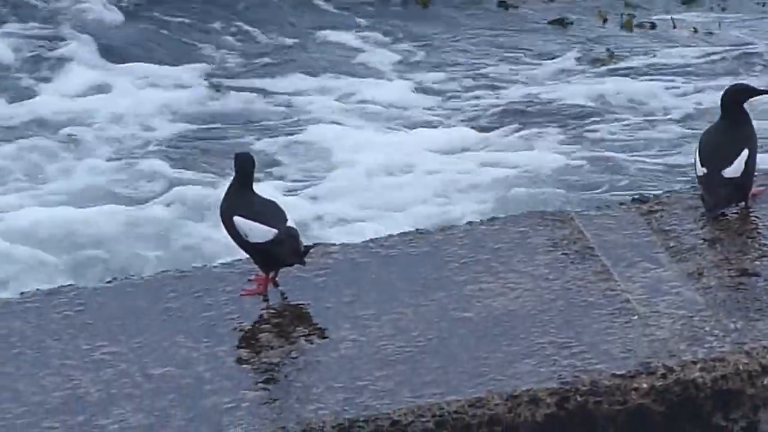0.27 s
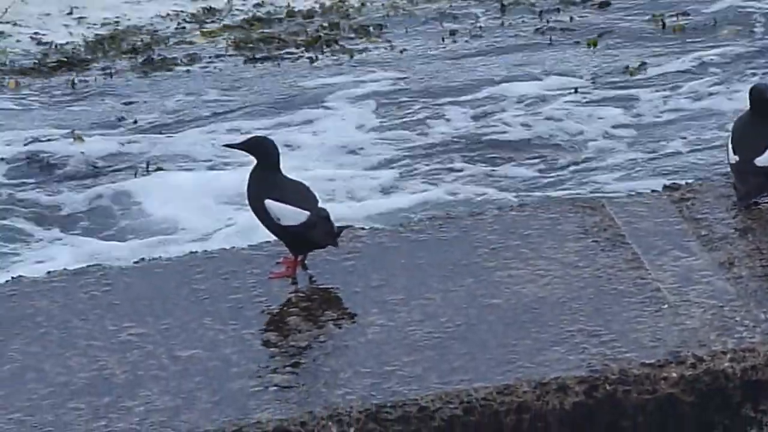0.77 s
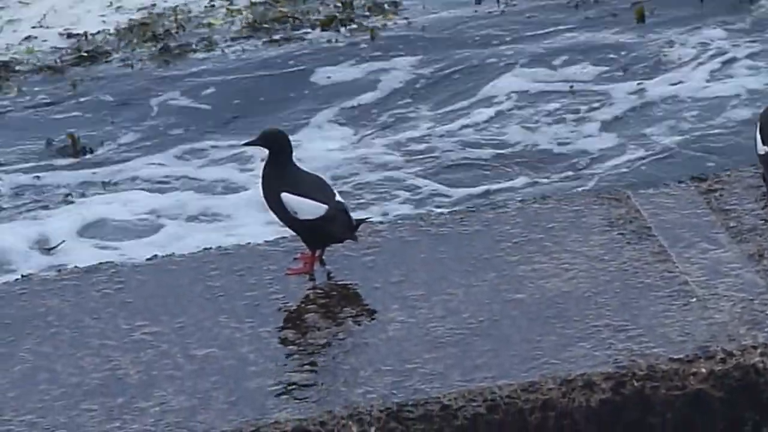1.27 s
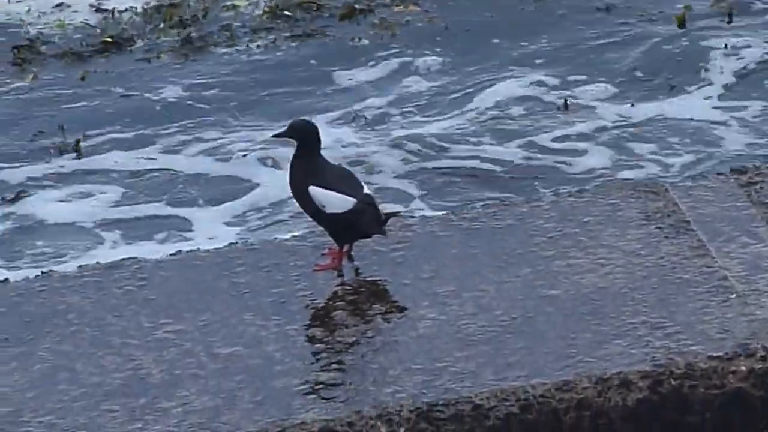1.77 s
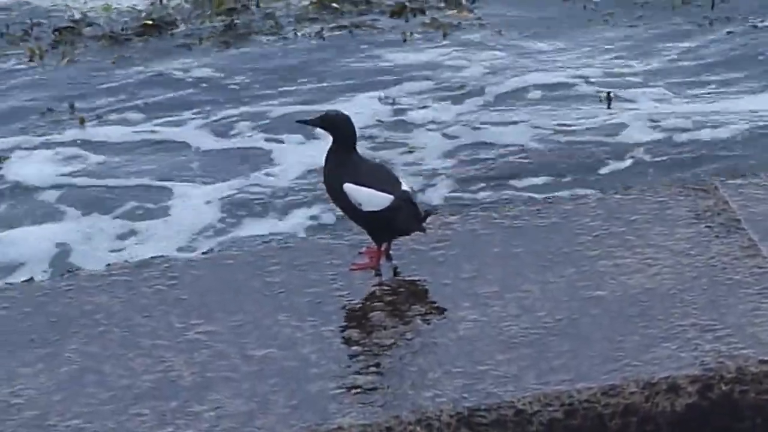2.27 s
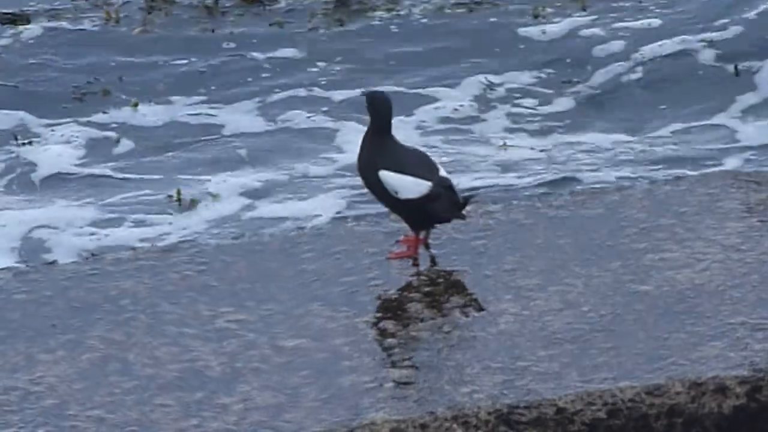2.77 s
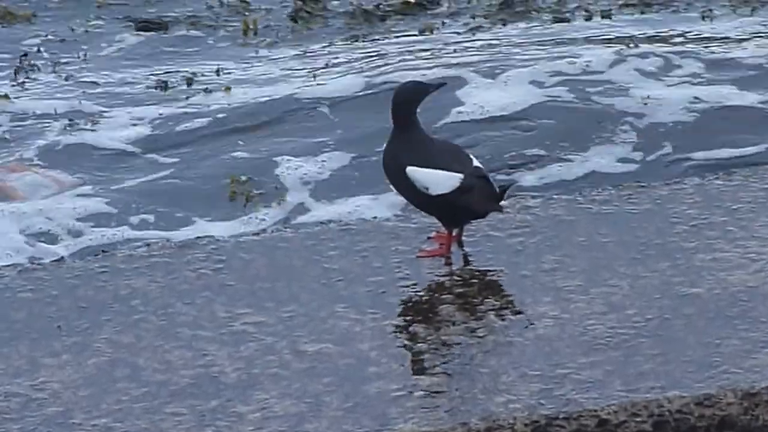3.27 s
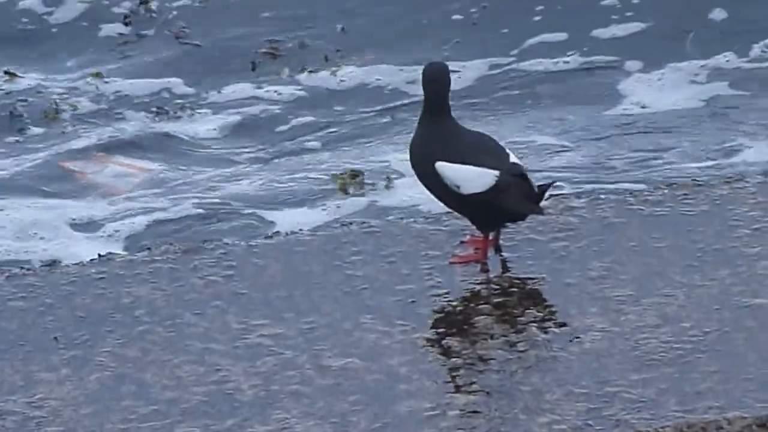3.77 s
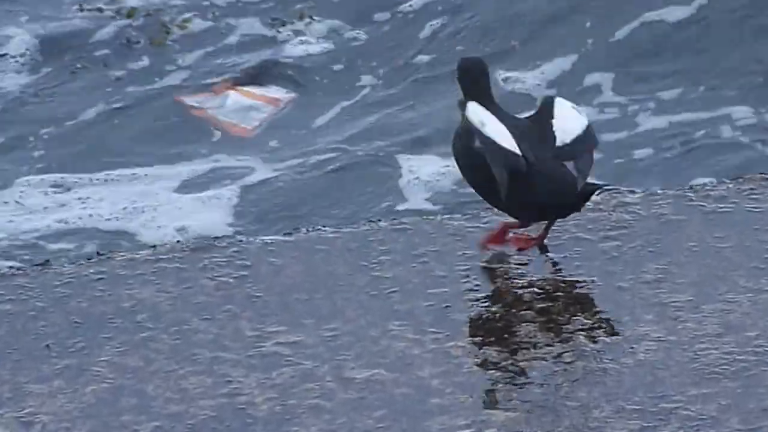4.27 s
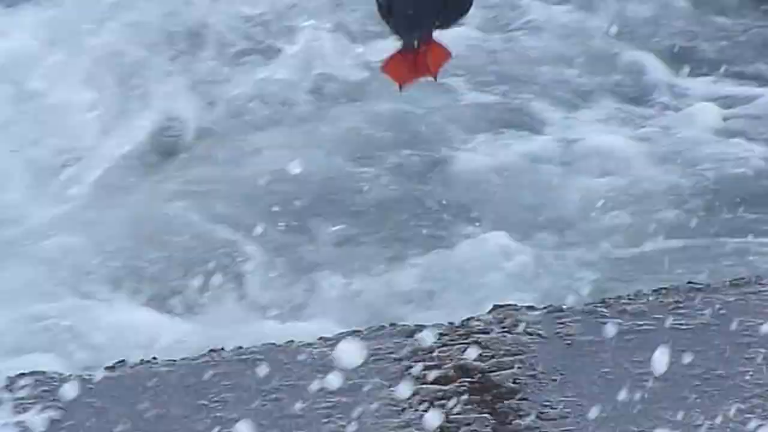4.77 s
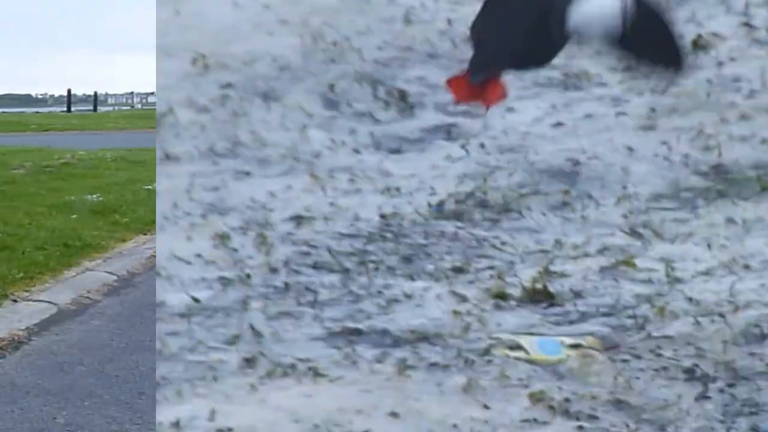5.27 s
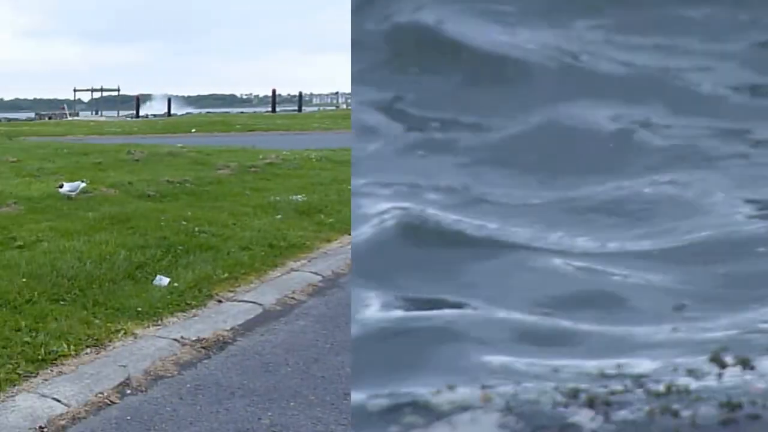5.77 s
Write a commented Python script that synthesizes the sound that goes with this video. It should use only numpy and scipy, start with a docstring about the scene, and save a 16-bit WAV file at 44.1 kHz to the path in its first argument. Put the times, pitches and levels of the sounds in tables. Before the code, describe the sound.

Gusty wind buffets an outdoor stereo microphone on a stormy shore, with low fluttering and small, sudden thumps. Just ahead, restless surf keeps washing over a concrete ramp, swelling again and again with roaring bubbles and fizzing foam. One wave stands out early, and a longer hiss of spray comes near the end between two hard gusts, before the wash eases.

```python
"""Storm surf churns against a concrete slipway: heavy water rumbles, clouds of bubbles roar,
foam hisses and spray patters down. The microphone is a camera's stereo pair, out in the wind:
gusts flutter on its two ports, and the hardest shoves of air make the gain control duck.
The camera cuts the deep bass and the top treble and notches out the pitches of its own motors."""
import sys
import numpy as np
from scipy import signal
from scipy.fft import rfft, irfft, next_fast_len
from scipy.io import wavfile
from scipy.ndimage import uniform_filter1d

SR = 44100
rng = np.random.default_rng(int(sys.argv[2]) if len(sys.argv) > 2 else 0)


def generate_wav(sig):
    """Save sig (samples, or channels by samples) to the path in sys.argv[1] as 16-bit PCM at SR."""
    pcm = np.round(np.clip(np.atleast_2d(sig).T, -1, 1) * 32767).astype(np.int16)
    wavfile.write(sys.argv[1], SR, pcm)


N = 265967
TIME = np.arange(N) / SR
FFT_SIZE = next_fast_len(N, True)
BIN_HZ = np.maximum(np.arange(FFT_SIZE // 2 + 1) * SR / FFT_SIZE, 1)

# Spectrum of breaking water: frequency_hz, density_db
SEA_SPECTRUM = [(40, -10), (90, -13.5), (160, -12), (280, -3), (500, -1.4), (800, -1), (1150, -5),
                (1600, -10), (2300, -4.5), (3600, -9.5), (5000, -16), (6500, -17), (8400, -29.5),
                (9400, -43)]


def surf():
    """Heavy water, a roaring bubble cloud, foam and mist on top; more foam throws more spray."""
    rumble_db, roar_db, hiss_db = breakers()
    mist_db = -13 + .55 * (hiss_db - roar_db)   # relative to the foam
    rumble = water_noise(20, 420, bands=4, patch_db=.75, patch_hz=8.3, surge_db=-.1, surge_hz=19)
    roar = water_noise(420, 1500, bands=5, patch_db=1.36, patch_hz=11, surge_db=.5, surge_hz=140)
    hiss = water_noise(1500, 5430, bands=4, patch_db=.87, patch_hz=32, surge_db=.37, surge_hz=30)
    mist = water_noise(5430, 10000, bands=3, patch_db=.5, patch_hz=18, surge_db=.5, surge_hz=38)
    bubbles_per_s = 500 * from_db(roar_db - roar_db.mean())
    drops_per_s = 900 * from_db(hiss_db - hiss_db.mean())
    bubbles = close_pops(bubbles_per_s, 380, 1670, cycles=22, spread_db=4, width_db=-.5)
    spray = close_pops(drops_per_s, 1700, 9600, cycles=40, spread_db=7.5, width_db=7)
    churn = from_db(roar_db) * (from_db(.43) * roar + from_db(-15) * bubbles)
    foam = from_db(hiss_db) * (from_db(-.95) * hiss + from_db(mist_db) * mist + from_db(-22) * spray)
    return from_db(rumble_db) * rumble + churn * pan(-.8) + foam * pan(-2.7)


def breakers(roar_decay_db_per_s=49.5, foam_decay_db_per_s=42.5, swell_db=-30, rumble_re_roar_db=-8):
    """Levels of rumble, roar and hiss in dB: each wave adds its power to the wash."""
    # Waves breaking on the slipway: crest_s, build_s, hold_s, roar_db, hiss_db
    waves = [(0.06, .08, .1, -23, -24.5), (0.56, .14, 0.15, -23, -23.5), (0.786, 0.072, 0.22, -24, -22.5),
             (1.13, .1, .05, -16.5, -17.5), (1.258, 0.033, .04, -20.5, -23.5), (1.458, 0.11, .1, -21, -23),
             (1.748, .08, .04, -23.5, -26), (2.125, 0.21, .1, -29, -25), (2.506, 0.11, 0.074, -19.5, -20.5),
             (2.76, .08, 0.12, -23, -25), (2.964, .08, 0.15, -21, -21.5),
             (3.246, 0.033, 0.055, -22.5, -23.5), (3.647, .06, 0.097, -20.5, -21.5),
             (4.085, 0.11, .06, -22.5, -23.5), (4.262, .07, .04, -23, -21.5), (4.798, 0.25, .28, -23, -19),
             (5.308, 0.017, 0.033, -24.5, -30)]
    # Restless water between the waves, drawing back at the end: time_s, level_db
    wash = [(0, -26), (1.9, -25), (3.4, -24.5), (4.5, -27), (5.2, -27), (5.45, -30.5), (6.03, -32.5)]
    wash_db = np.interp(TIME, *np.transpose(wash))
    roar_power = hiss_power = from_db(wash_db) ** 2
    for crest_s, build_s, hold_s, roar_db, hiss_db in waves:
        roar = from_db(roar_db) * envelope(crest_s, build_s, hold_s, roar_decay_db_per_s)
        hiss = from_db(hiss_db) * envelope(crest_s, build_s, hold_s, foam_decay_db_per_s)
        roar_power = roar_power + roar ** 2
        hiss_power = hiss_power + hiss ** 2
    rumble_power = from_db(swell_db) ** 2 + from_db(rumble_re_roar_db) ** 2 * roar_power
    return 10 * np.log10([rumble_power, roar_power, hiss_power])


def water_noise(low_hz, high_hz, bands, patch_db, patch_hz, surge_db, surge_hz, lag_s=4e-5):
    """Countless bubbles merge into noise; each band swells in patches and all surge together; rms 1."""
    # How alike the sea is at the two ports: frequency_hz, coherence (0-1)
    likeness = [(100, .93), (500, .96), (1100, .92), (1800, .62), (2300, .78), (3200, .56), (4200, .42),
                (5000, .25), (6400, .62), (8200, .32)]
    mid, side = white_spectra()
    coherence = at_hz(likeness, BIN_HZ)
    ports = np.sqrt(1 + coherence) * mid + np.sqrt(1 - coherence) * side * [[1], [-1]]
    delay_s = lag_s / (1 + (BIN_HZ / 5000) ** 4)   # the sea reaches the left port first
    ports[1] *= np.exp(-2j * np.pi * BIN_HZ * delay_s)
    ports *= from_db(at_hz(SEA_SPECTRUM, BIN_HZ))
    edges_hz = np.geomspace(low_hz, high_hz, bands + 1)
    water = np.zeros((2, N))
    for bottom, top in zip(edges_hz, edges_hz[1:]):
        band = irfft(ports * ((BIN_HZ >= bottom) & (BIN_HZ < top)), FFT_SIZE)[:, :N]
        water += band * from_db(patch_db * drift(patch_hz))
    return rms_one(water * from_db(surge_db * drift(surge_hz)))


def close_pops(per_s, low_hz, high_hz, cycles, spread_db, width_db, pitches=16):
    """Bubbles or drops near the microphone: uneven clicks ring briefly, each from its own side; rms 1."""
    pops = np.zeros((2, N))
    for hz in np.geomspace(low_hz, high_hz, pitches):
        onsets = np.flatnonzero(rng.random(N) < per_s / pitches / SR)
        size_db = spread_db * np.minimum(rng.exponential(1, len(onsets)), np.pi)
        heights = from_db(size_db) * rng.choice([-1, 1], len(onsets))
        clicks = np.full((2, N), 1e-18)
        clicks[:, onsets] = heights * pan(width_db * rng.standard_normal(len(onsets)))
        pole = np.exp(-np.log(1000) * hz / (cycles * SR))   # 60 dB down after that many cycles
        angle = 2 * np.pi * hz / SR
        ring = signal.lfilter([1, 0, -1], [1, -2 * pole * np.cos(angle), pole * pole], clicks)
        pops += ring * from_db(at_hz(SEA_SPECTRUM, hz)) * hz   # short, high rings need more height
    return rms_one(pops)


def wind(breeze_db=-52.5, attack_s=.032, release_db_per_s=126.5, lump_db=4, lump_hz=45):
    """Gusts rise out of a light breeze; each port has its own turbulence, which comes in lumps."""
    # Gusts on the microphone: crest_s, hold_s, level_db, left_minus_right_db
    gusts = [(0.07, 0.13, -17.5, -0.5), (0.275, 0.26, -23.5, 1), (0.568, 0.045, -20, 7),
             (1.454, 0.065, -22.5, 5), (1.781, 0.079, -19, 7), (1.961, 0.067, -20, 5),
             (2.183, 0.087, -18.5, 3.5), (2.48, 0.26, -22, 4), (2.781, 0.071, -20.5, 9),
             (3.02, .14, -22, 3.5), (3.257, 0.034, -15.5, -4.5), (3.397, 0.17, -19.5, 2),
             (3.648, 0.056, -24, 9), (3.769, 0.16, -16, 4), (3.96, 0.065, -21, -11), (4.137, 0.033, -15, 4),
             (4.332, 0.078, -10.5, -0.5), (4.527, 0.27, -22.5, 2), (4.918, 0.13, -25.5, 6),
             (5.096, 0.085, -11.5, -1), (5.25, 0.21, -19, 1.5), (5.494, 0.24, -23, 0.5),
             (5.834, 0.15, -24.5, 1)]
    # Spectrum of the turbulence: frequency_hz, density_db
    wind_spectrum = [(35, -7), (60, 5.5), (110, -2), (200, -1), (330, 0), (500, -3), (750, -11.5),
                     (1100, -12), (2000, -26), (4000, -58)]
    power = from_db(breeze_db) ** 2
    for crest_s, hold_s, level_db, balance_db in gusts:
        gust = from_db(level_db) * envelope(crest_s, attack_s, hold_s, release_db_per_s)
        power = power + (gust * pan(balance_db)) ** 2
    turbulence = irfft(white_spectra() * from_db(at_hz(wind_spectrum, BIN_HZ)), FFT_SIZE)[:, :N]
    lumps = from_db(lump_db * np.array([drift(lump_hz), drift(lump_hz)]))
    return np.sqrt(power) * rms_one(turbulence * lumps)


def eddies(trim_db=-3, typical_width_s=.00048):
    """An eddy crossing a port is one quick push and pull, of either sign."""
    # Single eddies slapping the ports: time_s, relative_peak_db, left_minus_right_db
    slaps = [(0.069, -13, 19), (0.193, -8, 16), (0.613, -6, 20), (1.543, 8, -14), (1.798, -5, 12),
             (1.863, -1, 15), (2.209, -3, 16), (2.628, 3, 10), (3.291, -5, -21), (3.53, 6, 14),
             (3.846, -1, 8), (4.155, 0, 10), (4.34, 6, 12), (4.775, -5, 21), (5.308, -4.5, -1),
             (5.364, 1, 23), (5.439, -5, -9), (5.519, -6, 2), (5.581, -4.5, -11.5), (5.679, -8, 6)]
    pressure = np.zeros((2, N))
    for time_s, peak_db, balance_db in slaps:
        width_s = typical_width_s * from_db(rng.standard_normal())
        passage = np.clip((TIME - time_s) / width_s, -10, 10)
        push_pull = passage * np.exp((1 - passage ** 2) / 2)
        pressure += from_db(peak_db + trim_db) * pan(balance_db) * rng.choice([-1, 1]) * push_pull
    return pressure


def shoves(width_s=.0135):
    """Slow bumps of air pressure, too deep to hear, press on both ports at once."""
    # Pressure bumps at the microphone: time_s, peak_db
    bumps = [(1.559, 2.5), (1.803, 2.7), (2.65, 1.5), (3.283, 3.5), (3.573, 6), (4.341, 3.5), (5.106, 5),
             (5.387, 4.5)]
    return sum(from_db(peak_db) * np.exp(-.5 * np.minimum(((TIME - time_s) / width_s) ** 2, 100))
               for time_s, peak_db in bumps)


def gain_control(sound, release_db_per_s=25):
    """Pressure above full scale pulls the camera's gain down at once; it recovers slowly."""
    pressure = np.abs(uniform_filter1d(sound.mean(axis=0), size=220))
    over_db = 20 * np.log10(np.maximum(pressure, 1))
    recovery_db = release_db_per_s * TIME
    duck_db = np.maximum.accumulate(over_db + recovery_db) - recovery_db
    return sound * from_db(-duck_db)


def envelope(crest_s, attack_s, hold_s, release_db_per_s):
    """Swell smoothly to 1 at crest_s, hold, then die away."""
    early = np.clip((crest_s - TIME) / attack_s, 0, 10)
    late_s = np.clip(TIME - crest_s - hold_s, 0, 2)
    return np.exp(-early ** 2) * from_db(-release_db_per_s * late_s)


def drift(rate_hz, step=20):
    """Smooth random wander that changes about rate_hz times a second; rms 1."""
    pole = np.exp(-2 * np.pi * step * rate_hz / SR)
    noise = rng.standard_normal(N // step + 4002)
    slow = signal.lfilter([1], [1, -2 * pole, pole * pole], noise)[4000:]   # once settled
    return np.interp(np.arange(N) / step, np.arange(len(slow)), rms_one(slow))


def white_spectra():
    """Spectra of two unrelated white noises."""
    return rfft(rng.standard_normal((2, FFT_SIZE)))


def at_hz(curve, hz):
    """Read a table on a log-frequency axis."""
    points_hz, values = np.transpose(curve)
    return np.interp(np.log(hz), np.log(points_hz), values)


def pan(balance_db):
    """Left and right gains of constant total power; positive is to the left."""
    gains = from_db(np.array([[.5], [-.5]]) * balance_db)
    return gains / np.sqrt(np.mean(gains ** 2, axis=0))


def from_db(db):
    """Decibels to gain."""
    return 10 ** (np.asarray(db) / 20)


def rms_one(x):
    """Scale to rms 1."""
    return x / np.sqrt(np.mean(x ** 2) + 1e-20)


def scene():
    """The sea ahead and the wind right on the microphone."""
    ceiling = .5   # the ports round off the hardest gusts and eddies
    buffeting = ceiling * np.tanh((wind() + eddies()) / ceiling)
    return surf() + buffeting + shoves()


def record(dry, low_cut_hz=150, top_cut_hz=9640, whine_db=-2):
    """The camera: gain control, wind filter, motor notches, a thin whine and a steep top cut."""
    # Notches at the pitches of the camera's motors: pitch_hz, width_hz
    notches = [(2600, 2098), (4600, 961), (5430, 431), (7900, 370), (8100, 374)]
    wind_filter = signal.butter(3, low_cut_hz, "high", fs=SR, output="sos")
    sound = signal.sosfilt(wind_filter, gain_control(dry))
    whine_band = signal.butter(2, [7988, 8012], "band", fs=SR, output="sos")   # between the top notches
    whine = signal.sosfilt(whine_band, sound)
    for pitch_hz, width_hz in notches:
        sound = signal.lfilter(*signal.iirnotch(pitch_hz, pitch_hz / width_hz, SR), sound)
    top_cut = signal.ellip(16, .2, 90, top_cut_hz, fs=SR, output="sos")
    return signal.sosfilt(top_cut, sound + from_db(whine_db) * whine)


dry = scene()
out = record(dry)
generate_wav(out)
```